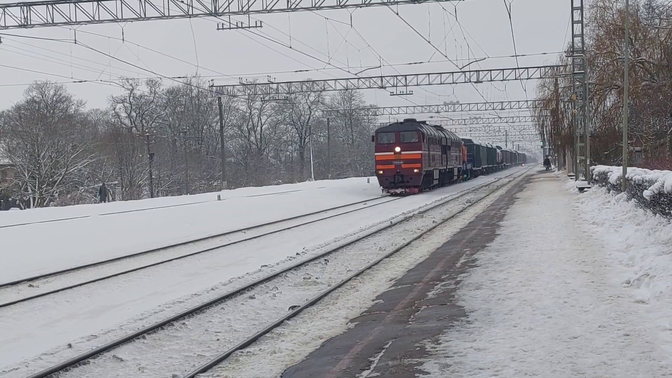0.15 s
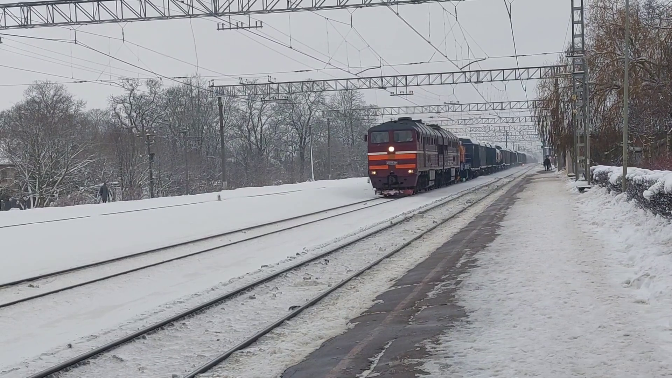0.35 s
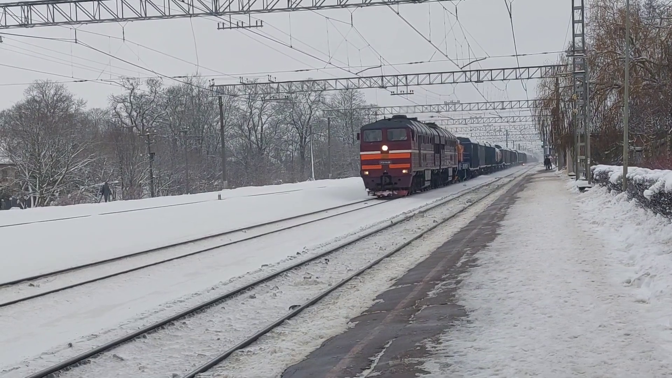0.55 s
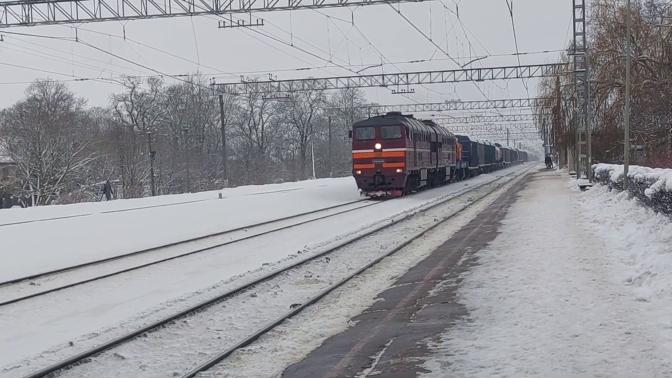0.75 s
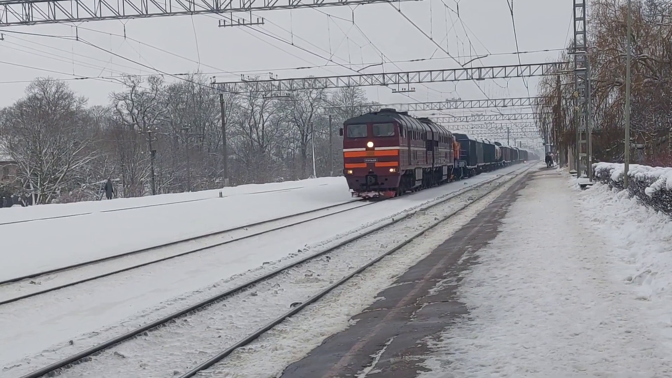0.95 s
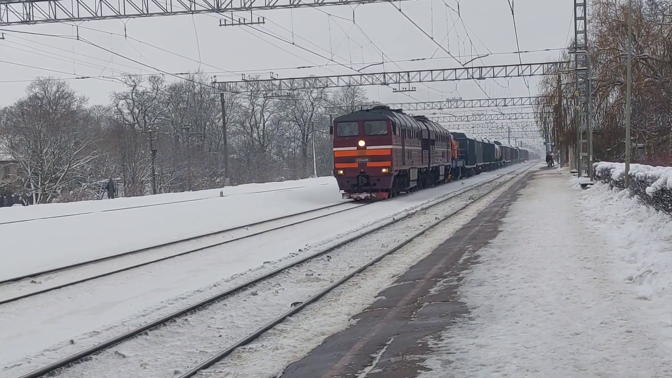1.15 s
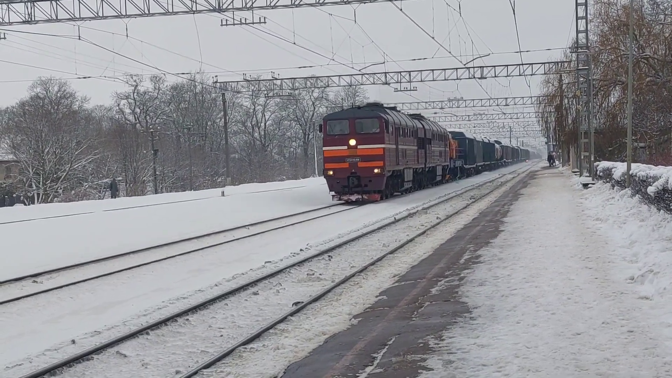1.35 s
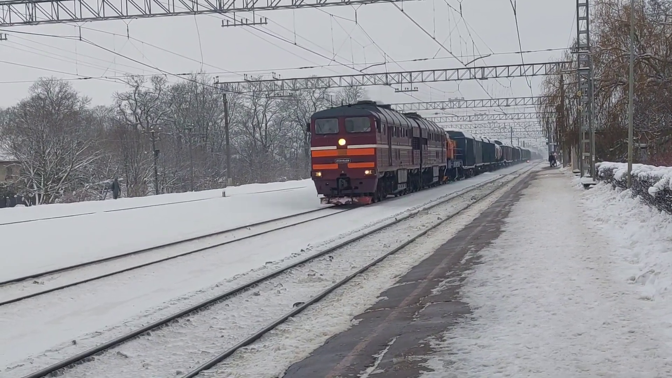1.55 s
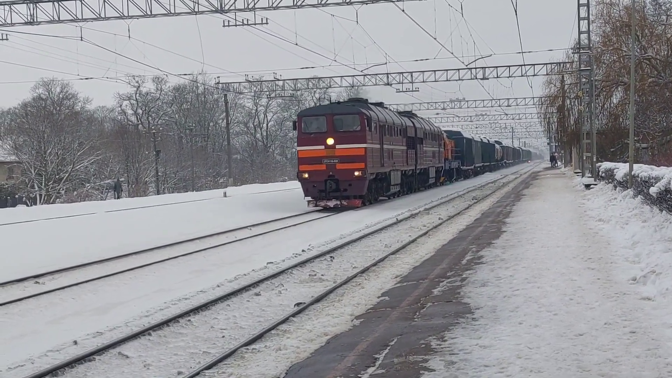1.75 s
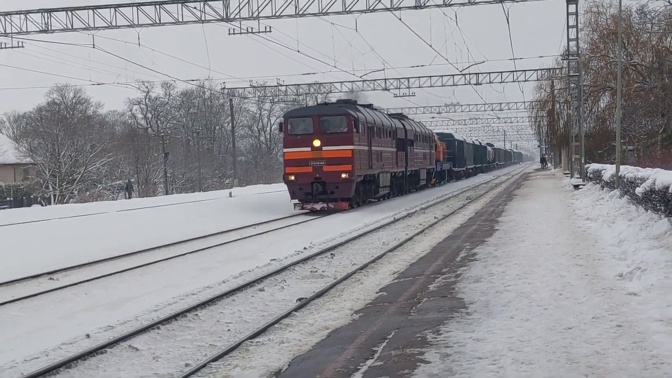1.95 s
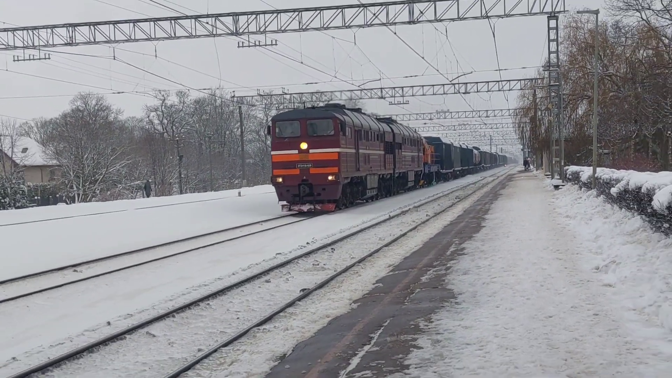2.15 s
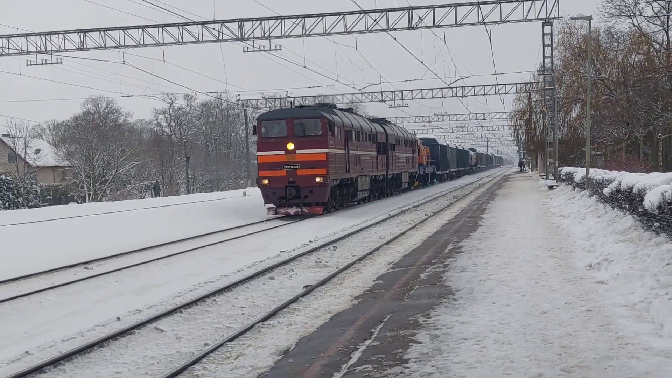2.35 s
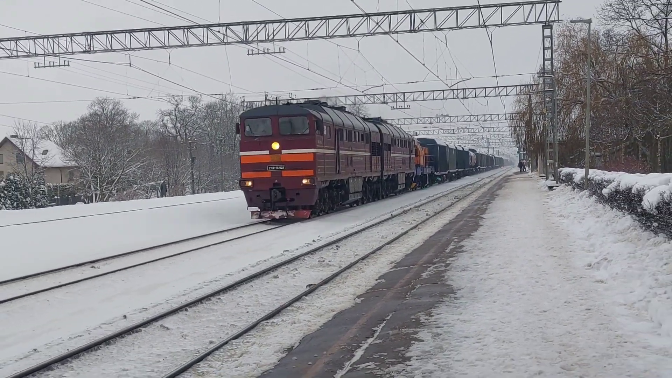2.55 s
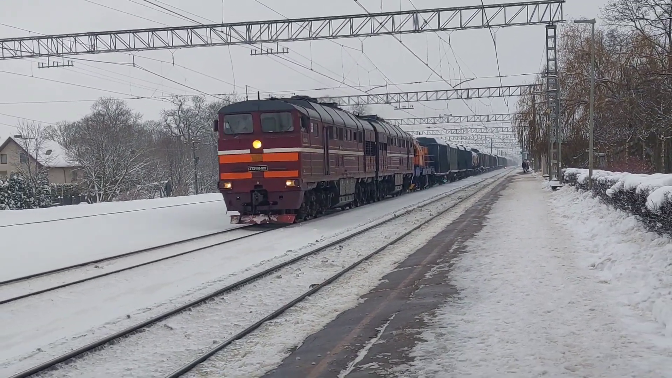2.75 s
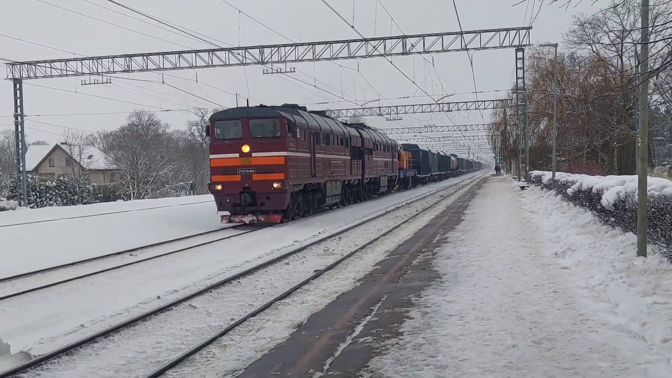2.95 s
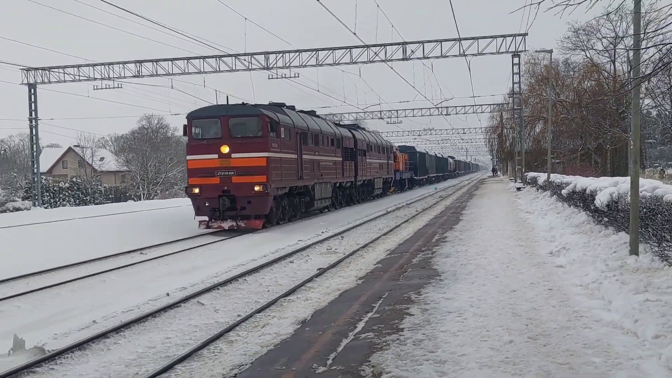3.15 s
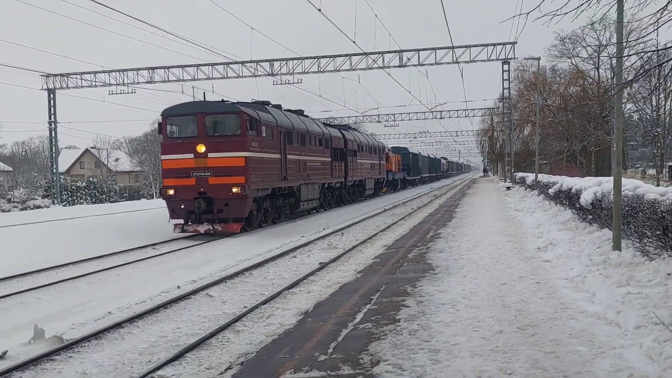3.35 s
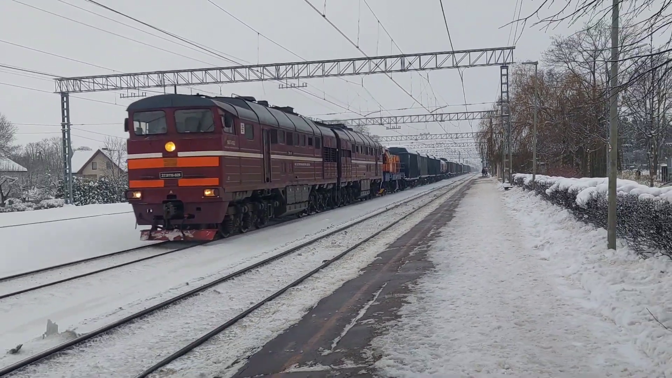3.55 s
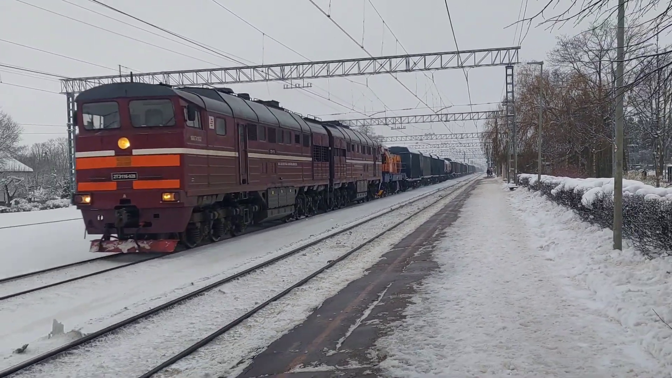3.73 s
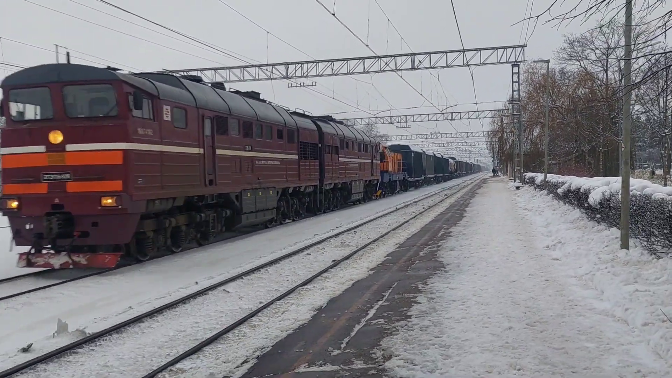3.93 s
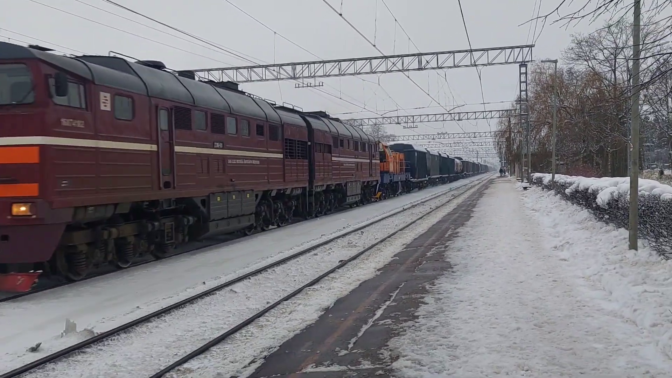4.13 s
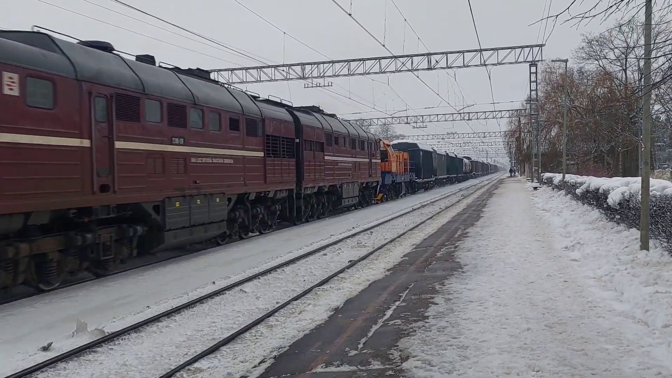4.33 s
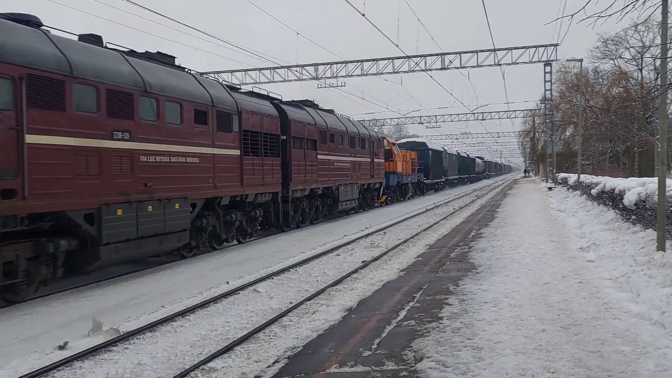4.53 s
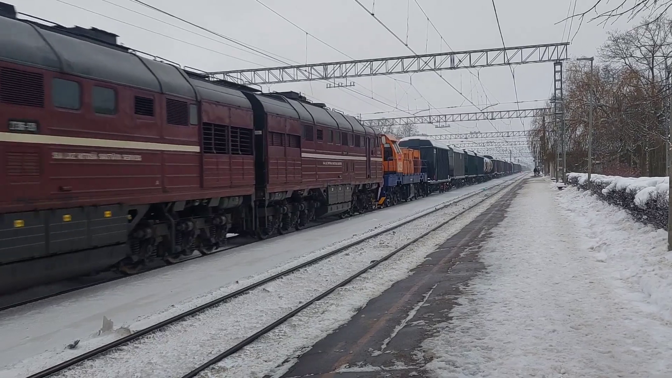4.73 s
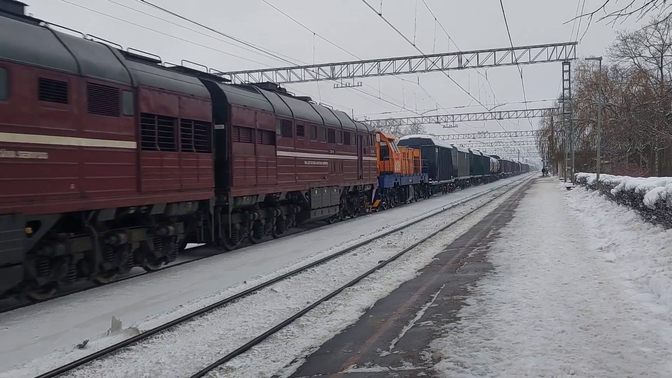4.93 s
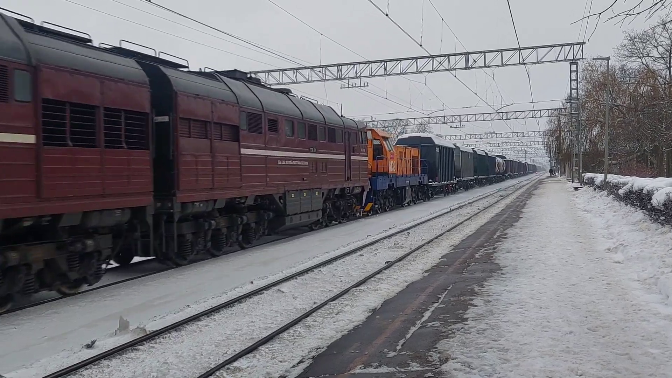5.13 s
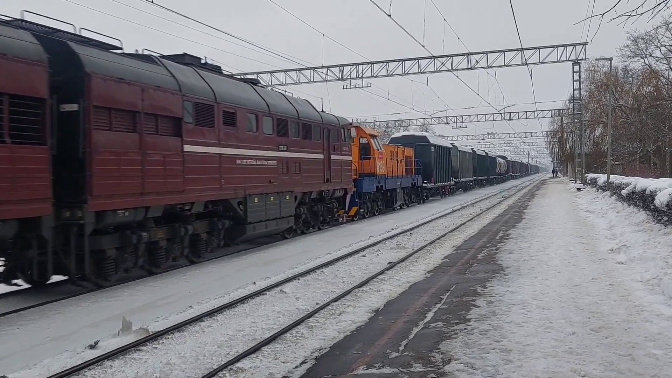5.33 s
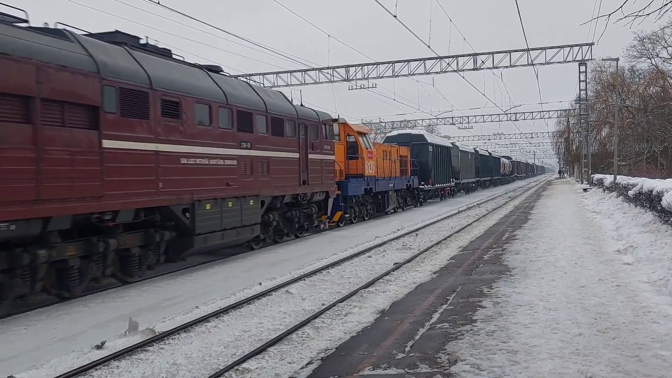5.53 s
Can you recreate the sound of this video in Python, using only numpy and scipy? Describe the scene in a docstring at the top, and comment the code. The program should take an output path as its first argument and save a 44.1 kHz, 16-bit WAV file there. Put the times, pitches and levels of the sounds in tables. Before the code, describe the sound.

From the start, a diesel locomotive pulling a freight train is heard approaching a snowy platform. Its low exhaust throbs about eleven times a second over a soft rumble of wheels. A blower hum swells around 1, 1.8 and 2.8 seconds, while a mid-pitched generator whine and a thin, high turbocharger whistle waver in from about 2 seconds. Everything grows steadily louder and brighter. Around 4 to 4.5 seconds the locomotive's nose draws level and the wheels surge into a roar with metallic rail ringing and hiss. The blower hum then fades, while cooling fan tones, gear whines and the whistle swell unevenly and drop in pitch. The exhaust keeps pulsing, and the wheel noise is still close and loud at the end, near 5.7 seconds. The left side sounds muffled and quieter throughout.

```python
"""A platform on a snowy line: a two-section diesel locomotive hauls a freight train up and draws level.
Unequal cylinders make the exhaust throb; blower blades hum; generator, gears, turbocharger and cooling
fans whine, each dropping in pitch as it comes abreast. Under them the running gear rumbles, and rough
steel wheels roar, ring and hiss on the rails. The microphone's left port is muffled."""
import sys
import numpy as np
from scipy import signal
from scipy.fft import rfft, irfft, next_fast_len
from scipy.io import wavfile
from scipy.ndimage import map_coordinates

SR = 44100
rng = np.random.default_rng(int(sys.argv[2]) if len(sys.argv) > 2 else 0)


def bounce(signal):
    """Save signal as a 16-bit WAV file at the path given by the first command-line argument."""
    frames = np.transpose(np.atleast_2d(signal))
    limited = np.clip(frames, -1, 1)
    pcm = np.round(limited * 32767).astype(np.int16)
    wavfile.write(sys.argv[1], SR, pcm)


N = 250488
T = np.arange(N) / SR

TRAIN_M_PER_S, SOUND_M_PER_S, TRACK_DISTANCE_M, SNOW_SPAN_M = 15.5, 343, 8.0, 50
NOSE_ABREAST_S, ENGINE_ABREAST_S = 4.508, 5.75

# Weak exhaust lines. Each row: multiple of the engine cycle, level in dB against the main pair.
EXHAUST_ORDERS = [(7, -17), (8, -17), (9, -15), (10, -19), (12, -19), (20, -20), (23, -22), (24, -21)]
# Noise spectra. Each row: frequency in Hz, relative density in dB.
EXHAUST_GAS_SPECTRUM = [(30, -33), (36, -8), (42, 18.5), (60, 15), (95, 4.5), (130, -42.5)]
RUMBLE_SPECTRUM = [(25, -36), (40, -6.5), (62, -4.5), (85, -4.5), (105, -4), (150, -0.5), (205, -0.8),
                   (280, 0.5), (370, -2), (420, -6), (500, -27), (700, -72.5)]
ROAR_SPECTRUM = [(330, -27), (470, -2), (600, -2.5), (735, 3.5), (800, -0.5), (900, -1.5), (985, -0.5),
                 (1050, -5), (1200, -17.5), (1600, -76)]
RAIL_RING_SPECTRUM = [(900, -18), (1230, -4.5), (1600, 0.5), (2100, -3), (2800, -6), (3080, -9.5),
                      (3350, -13.5), (4200, -82)]
RAIL_HISS_SPECTRUM = [(2900, -27), (3450, -4), (3900, 0), (5000, -5), (6000, -10), (6700, -10),
                      (7800, -27.5), (9500, -25), (12500, -19), (15500, -20.5)]
PREAMP_SPECTRUM = [(7000, -17), (12500, -24.5), (14500, 1), (15500, 2.5)]
# Swells of single sources. Each row: centre in seconds, length in seconds, peak change in dB.
THROB_SWELLS = [(1.3, .7, 2.5), (2.1, 0.73, 2.5), (2.72, 0.68, 4), (3.55, 0.67, 3), (4.58, 0.13, 3.5),
                (5.1, .26, 11.5), (5.35, 0.18, 13.5)]
BLOWER_SWELLS = [(.95, 0.44, 7.5), (1.82, .4, 7), (2.75, 2.1, 5.5), (4.36, 0.23, 2)]
GENERATOR_WHINE_SWELLS = [(1.65, 0.4, 4), (3.2, 0.86, 4.5), (3.93, 0.57, 8), (4.24, 0.28, -12),
                          (4.66, 0.28, 8.5), (5.03, 0.37, 6.5), (5.54, 0.22, 12)]
TURBO_WHISTLE_SWELLS = [(1.83, 0.2, 6), (2.18, 0.32, 7), (2.76, .3, 10), (3.12, 0.5, 9.5), (3.52, 0.27, 6),
                        (4.09, .4, 9.5), (4.48, 0.16, 10.5), (4.71, 0.12, 8), (4.93, 0.27, 5),
                        (5.26, .14, 13), (5.42, 0.31, 14.5), (5.56, 0.2, 10)]
TURBO_OCTAVE_SWELLS = [(3.68, 0.28, 5), (4.05, .3, 4), (4.45, .25, 5), (4.68, .15, 5), (5.6, .2, 6)]
# Gear whine swells. Each row: centre in seconds, length in seconds, change in dB of low and high whine.
GEAR_WHINE_SWELLS = [(4.47, 0.4, 9, -5), (4.8, 0.35, 11.5, 4), (5.04, .25, 3, 4), (5.28, .2, 0, 8),
                     (5.5, 0.28, 12, 9), (5.67, 0.13, 8, 0)]
# Fan swells. Each row: centre in seconds, length in seconds, change in dB of low, middle and high tone.
FAN_TONE_SWELLS = [(4.22, 0.56, 4, 9.5, 5), (4.44, 0.3, 4, 0, 12), (4.8, 0.37, -6, 6, 1.5),
                   (5.0, 0.49, 8, 5.5, 0), (5.29, 0.22, 5.5, 7, -4), (5.47, 0.17, -1, -7, 0),
                   (5.63, .2, 1, 10.5, 8)]
# Surges as bogies pass. Each row: centre in seconds, length in seconds, rise in dB of rumble, roar,
# rail ring and hiss.
BOGIE_SWELLS = [(4.1, 0.49, 0.98, 1.7, 1.6, 2.6), (4.43, 0.1, 0, 0, 0.7, 3.9),
                (5.24, 0.22, 0.83, 1, 0.81, 1.5), (5.6, 0.96, 0.38, 0.63, 2.6, 3.6)]
# Wheel disc modes. Each row: frequency at rest in Hz, width in Hz, level in dB against the rail ring.
WHEEL_DISC_MODES = [(1428, 60, -13.5), (1646, 70, -12), (1895, 64, -30), (3844, 74, -21), (4700, 160, -27),
                    (5700, 87, -43), (6640, 72, -47)]
# Responses of distant air, the muffled port and both ports. Each row: frequency in Hz, gain in dB.
FAR_AIR_RESPONSE = [(4000, 1), (6000, -0.5), (8000, -4.0), (14000, -4.5)]
LEFT_PORT_RESPONSE = [(60, -3), (250, -6.5), (520, -5.5), (1000, -12.5), (1600, -11.5), (2400, -28.5),
                      (3150, -18), (4200, -32.5), (7000, -34), (12000, -23.5)]
MIC_RESPONSE = [(60, 2.33), (250, 2.61), (1000, 4.43), (3000, 6.08), (12000, 2.26)]


def undb(db):
    """Decibels to gain."""
    return 10 ** (np.asarray(db) / 20)


def unit_rms(x):
    """Scale to rms 1."""
    return x / np.sqrt(np.mean(np.abs(x) ** 2))


def colour(x, response):
    """Filter by (Hz, dB) rows."""
    hz, db = np.transpose(response)
    size = next_fast_len(N + 4096)
    bins_hz = np.maximum(np.fft.rfftfreq(size, 1 / SR), 1)
    gain = undb(np.interp(np.log(bins_hz), np.log(hz), db))
    return irfft(rfft(x, size) * gain, size)[:N]


def noise(spectrum):
    """Coloured noise, rms 1."""
    return unit_rms(colour(rng.standard_normal(N), spectrum))


def wander(rate_hz):
    """Smooth random curve, spread about 1."""
    knots = rng.standard_normal(4096)
    coarse_s = T[::64]
    curve = map_coordinates(knots, [coarse_s * rate_hz + 8], order=3, mode="wrap")
    return np.interp(T, coarse_s, curve)


def passing(abreast_s):
    """Emission time (gives the Doppler shift) and nearness (1 abreast) of a point on the train."""
    distance_m = np.hypot(TRAIN_M_PER_S * (T - abreast_s), TRACK_DISTANCE_M)
    return T - distance_m / SOUND_M_PER_S, TRACK_DISTANCE_M / distance_m


def tone(hz, clock_s, scatter, fade_hz):
    """A line heard directly and over scattered paths (share 0-1), which make it fade and swell."""
    scattered = (wander(fade_hz) + 1j * wander(fade_hz)) / np.sqrt(2)
    paths = np.sqrt(1 - scatter ** 2) + scatter * scattered
    return np.sqrt(2) * np.real(paths * np.exp(2j * np.pi * (hz * clock_s + rng.random())))


def swells_db(table):
    """Sum of raised-cosine bumps; one curve per dB column."""
    return sum(np.outer(peaks_db, np.cos(np.pi * np.clip((T - centre_s) / length_s, -.5, .5)) ** 2)
               for centre_s, length_s, *peaks_db in table)


def point_source_db(near, db, snow_db):
    """Level of one machine: falls as 1 / distance, and by snow_db more per SNOW_SPAN_M."""
    beyond_m = TRACK_DISTANCE_M / near - TRACK_DISTANCE_M
    return db + 20 * np.log10(near) - snow_db * beyond_m / SNOW_SPAN_M


def screening_db(at_s, over_s, db):
    """Level change as the locomotive's body moves in front of an outlet."""
    return db * (1 + np.tanh((T - at_s) / over_s)) / 2


def wheel_row_db(db, snow_db, late_s, wagons_db):
    """Level of a row of wheels: power grows with the angle filled, over steady wagons far behind."""
    ahead_m = TRAIN_M_PER_S * (NOSE_ABREAST_S + late_s - T)
    angle_share = np.arctan2(TRACK_DISTANCE_M, ahead_m) / np.pi
    beyond_m = np.hypot(np.maximum(ahead_m, 0), TRACK_DISTANCE_M) - TRACK_DISTANCE_M
    front = np.sqrt(angle_share) * undb(db - snow_db * beyond_m / SNOW_SPAN_M)
    return 20 * np.log10(np.hypot(front, undb(wagons_db)))


def engine_throb(clock_s):
    """Unequal cylinders give lines at multiples of the engine cycle; the main pair beats near 11 Hz."""
    cycle_hz, first_throb_s = 5.31, .044
    phase = 2 * np.pi * cycle_hz * (clock_s - first_throb_s)
    pair = unit_rms(np.exp(11j * phase) + undb(-2) * np.exp(13j * phase))
    weak_lines = sum(undb(db) * tone(order * cycle_hz, clock_s, scatter=.35, fade_hz=5)
                     for order, db in EXHAUST_ORDERS)
    gas = undb(-21.5) * noise(EXHAUST_GAS_SPECTRUM)
    chugs = np.sqrt(2) * pair.real + np.abs(pair) * (weak_lines + gas)
    return unit_rms(chugs * undb(.8 * wander(11)))  # no two chugs equally strong


def exhaust(throb, near):
    """The throb leaves the stack, which the roof edge hides once the locomotive is close."""
    (level_db,) = swells_db(THROB_SWELLS)
    level_db += point_source_db(near, db=-12, snow_db=5.5)
    level_db += screening_db(at_s=4.89, over_s=.2, db=-21.5)
    return throb * undb(level_db)


def blower(clock_s, near):
    """Blade tone and two overtones, the upper only from close by; beams forwards, so fades alongside."""
    blade_hz = 168.4
    (level_db,) = swells_db(BLOWER_SWELLS)
    level_db += point_source_db(near, db=-5.5, snow_db=15.5)
    level_db += screening_db(at_s=4.59, over_s=.38, db=-23.5)
    _, overtone_near = passing(abreast_s=4.1)
    hum = tone(blade_hz, clock_s, scatter=.14, fade_hz=14)
    hum += undb(-8) * tone(2 * blade_hz, clock_s, scatter=.28, fade_hz=6.1)
    hum += undb(-14) * overtone_near * tone(3 * blade_hz, clock_s, scatter=.6, fade_hz=12)
    return hum * undb(level_db)


def generator():
    """One whining line, partly screened by the body as it comes abreast."""
    clock_s, near = passing(abreast_s=5.42)
    (level_db,) = swells_db(GENERATOR_WHINE_SWELLS)
    level_db += point_source_db(near, db=-24.5, snow_db=7)
    level_db += screening_db(at_s=5.29, over_s=.13, db=-8)
    return tone(956, clock_s, scatter=.25, fade_hz=30) * undb(level_db)


def gears():
    """Two gear whines, each swelling and dropping in pitch as it comes abreast."""
    low_db, high_db = swells_db(GEAR_WHINE_SWELLS)
    clock_s, near = passing(abreast_s=5.67)
    low_db += point_source_db(near, db=-38, snow_db=3)
    low = tone(2478, clock_s, scatter=.51, fade_hz=55)
    clock_s, near = passing(abreast_s=5.62)
    high_db += point_source_db(near, db=-42.5, snow_db=15)
    high = tone(3608, clock_s, scatter=.85, fade_hz=45)
    return low * undb(low_db) + high * undb(high_db)


def turbocharger():
    """Whistle and octave, shimmering in moving air; the octave beams forwards."""
    whistle_hz = 3040
    clock_s, near = passing(abreast_s=5.68)
    (whistle_db,) = swells_db(TURBO_WHISTLE_SWELLS)
    whistle_db += point_source_db(near, db=-35.5, snow_db=4.5)
    whistle = tone(whistle_hz, clock_s, scatter=.4, fade_hz=80)
    (octave_db,) = swells_db(TURBO_OCTAVE_SWELLS)
    octave_db += point_source_db(near, db=-35.5, snow_db=17.5)
    octave_db += screening_db(at_s=4.55, over_s=.23, db=-6)
    octave = tone(2 * whistle_hz, clock_s, scatter=.59, fade_hz=50)
    return whistle * undb(whistle_db) + octave * undb(octave_db)


def cooling_fans():
    """Blades in turbulent air; multiples of the blade rate swell and fade as the side grilles go by."""
    blade_hz = 118.3
    low_db, middle_db, high_db = swells_db(FAN_TONE_SWELLS)
    clock_s, near = passing(abreast_s=5.5)
    low_db += point_source_db(near, db=-24.5, snow_db=10)
    low_db += screening_db(at_s=5.57, over_s=.1, db=-10)
    low = tone(2 * blade_hz, clock_s, scatter=.37, fade_hz=19)
    clock_s, near = passing(abreast_s=5.2)
    middle_db += point_source_db(near, db=-25, snow_db=12)
    middle = tone(3 * blade_hz, clock_s, scatter=.45, fade_hz=24)
    high_db += point_source_db(near, db=-28, snow_db=9)
    high_db += screening_db(at_s=5.27, over_s=.045, db=-27)
    high = tone(6 * blade_hz, clock_s, scatter=.24, fade_hz=30)
    high += undb(-10.5) * tone(9 * blade_hz, clock_s, scatter=.66, fade_hz=37)
    return low * undb(low_db) + middle * undb(middle_db) + high * undb(high_db)


def rolling(spectrum, db, flutter_db, spread):
    """Rough steel on steel, fluttering as wheels turn; the long train reaches the ports unalike (0-1)."""
    right, independent = noise(spectrum), noise(spectrum)
    left = np.sqrt(1 - spread ** 2) * right + spread * independent
    return np.array([left, right]) * undb(db + flutter_db * wander(25))


def running_gear_rumble(surge_db, throb):
    """Low rolling noise that swells with each exhaust pulse."""
    level_db = surge_db + wheel_row_db(db=-18.5, snow_db=8.5, late_s=-.5, wagons_db=-42.5)
    return rolling(RUMBLE_SPECTRUM, level_db + .67 * throb, flutter_db=-.24, spread=.37)


def wheel_roar(surge_db):
    """Midrange rolling noise of the wheels."""
    level_db = surge_db + wheel_row_db(db=-22, snow_db=11, late_s=-.13, wagons_db=-45.5)
    return rolling(ROAR_SPECTRUM, level_db, flutter_db=.9, spread=.82)


def rail_and_wheel_ring(surge_db):
    """Rough treads keep the rails ringing in a broad band, the wheel discs in narrow ones."""
    level_db = surge_db + wheel_row_db(db=-24, snow_db=9.5, late_s=.36, wagons_db=-49)
    rails = rolling(RAIL_RING_SPECTRUM, level_db, flutter_db=.56, spread=.97)
    clock_s, _ = passing(abreast_s=5.9)
    discs = sum(undb(db) * tone(hz, clock_s, scatter=.97, fade_hz=width_hz)
                for hz, width_hz, db in WHEEL_DISC_MODES)
    return rails + discs * undb(level_db)


def rail_hiss(surge_db):
    """Smooth hiss of many wheels; air absorbs its top while the train is far."""
    level_db = surge_db + wheel_row_db(db=-31.5, snow_db=15.5, late_s=.34, wagons_db=-61.5)
    bright = rolling(RAIL_HISS_SPECTRUM, level_db, flutter_db=.35, spread=.95)
    dull = np.array([colour(port, FAR_AIR_RESPONSE) for port in bright])
    _, near = passing(abreast_s=5.27)
    return dull + near * (bright - dull)


def rear_fans():
    """The second section's fans: still approaching at the end, so their pitch stays raised."""
    clock_s, near = passing(abreast_s=6.1)
    low = undb(-19.5) * tone(343, clock_s, scatter=.48, fade_hz=20)
    high = undb(-23.5) * tone(704, clock_s, scatter=1, fade_hz=26)
    return (low + high) * near ** 2


def scene():
    """Mono machines plus stereo wheel noise."""
    clock_s, near = passing(ENGINE_ABREAST_S)
    throb = engine_throb(clock_s)
    machines = exhaust(throb, near) + blower(clock_s, near) + generator() + gears()
    machines += turbocharger() + cooling_fans() + rear_fans()
    rumble_db, roar_db, ring_db, hiss_db = swells_db(BOGIE_SWELLS)
    wheels = running_gear_rumble(rumble_db, throb) + wheel_roar(roar_db)
    wheels += rail_and_wheel_ring(ring_db) + rail_hiss(hiss_db)
    return machines + wheels


def record(dry):
    """The left port is dull and leads as the engine swings to that side; faint preamp hiss; top cut."""
    _, near = passing(ENGINE_ABREAST_S)
    left_lag_ms = .12 - .37 * near
    left = colour(np.interp(T - left_lag_ms / 1000, T, dry[0]), LEFT_PORT_RESPONSE)
    hiss = undb(-62) * noise(PREAMP_SPECTRUM)
    left = colour(left, MIC_RESPONSE) + undb(-6.5) * hiss
    right = colour(dry[1], MIC_RESPONSE) + hiss
    cutoff_hz = 15900
    lowpass = signal.ellip(10, .2, 80, cutoff_hz, fs=SR, output="sos")
    return signal.sosfilt(lowpass, np.clip([left, right], -1, 1))


dry = scene()
out = record(dry)
bounce(out)
```